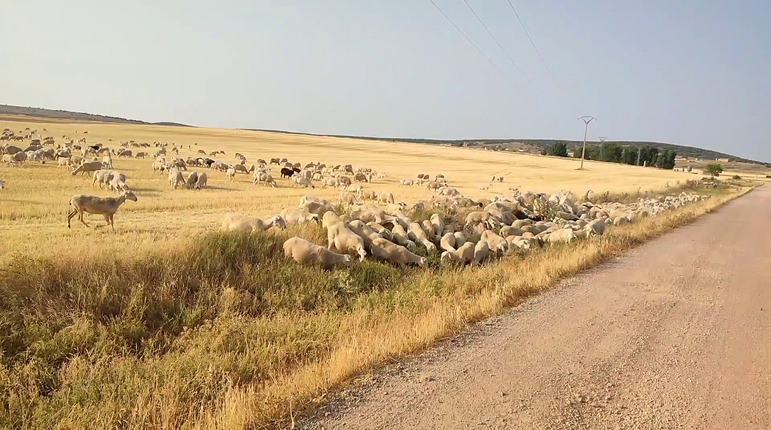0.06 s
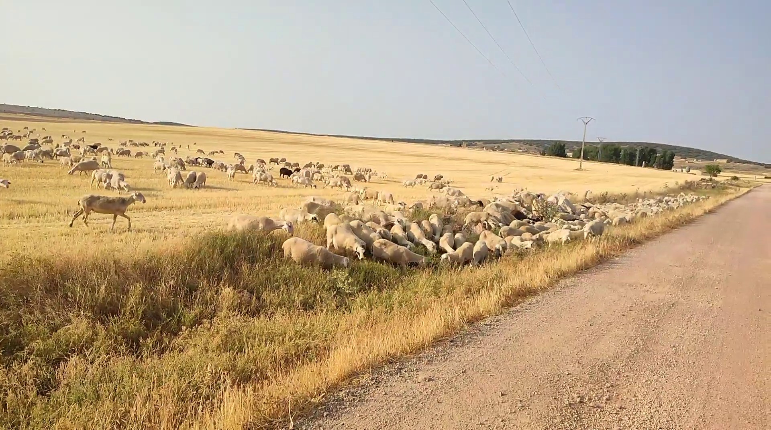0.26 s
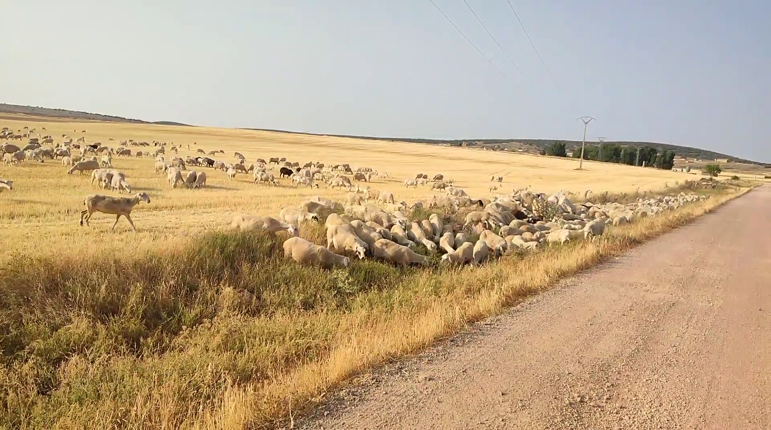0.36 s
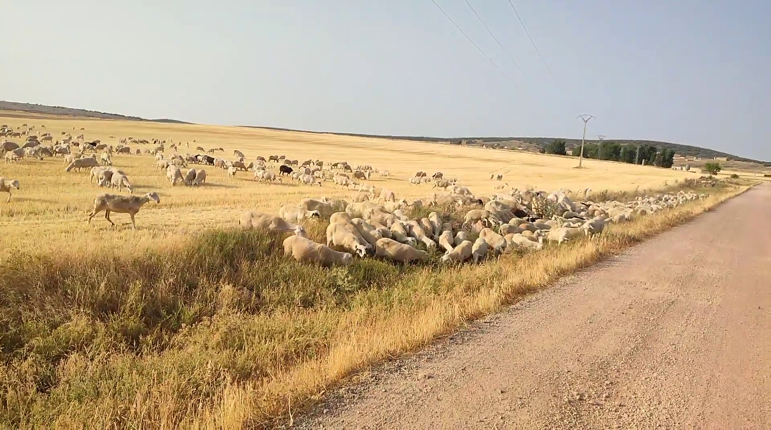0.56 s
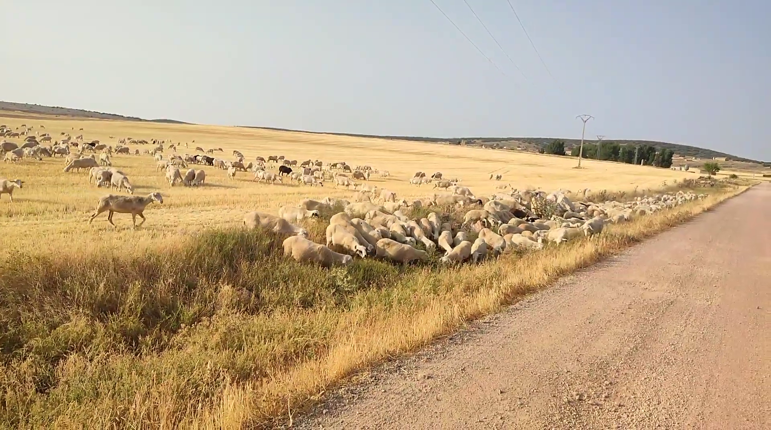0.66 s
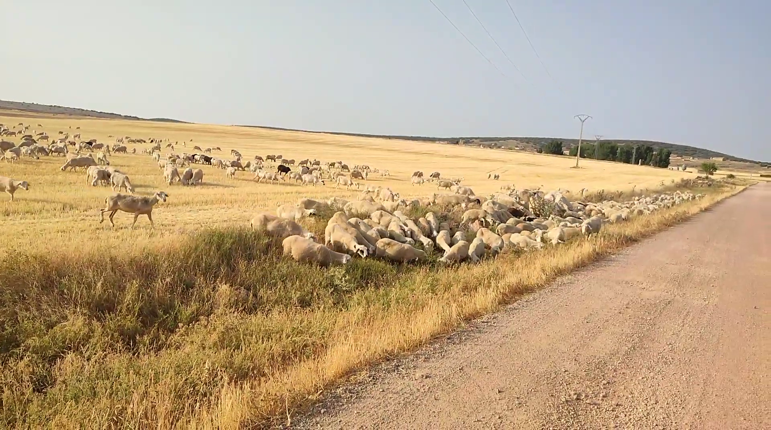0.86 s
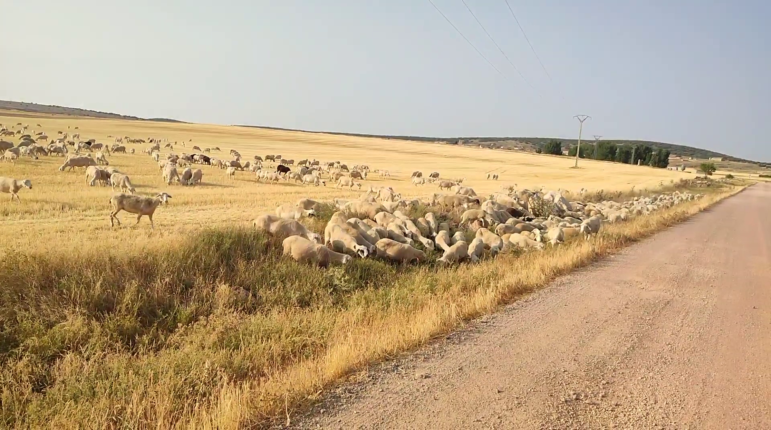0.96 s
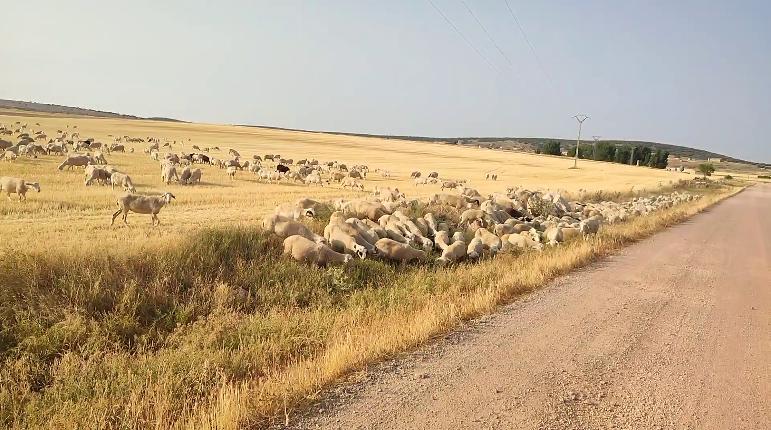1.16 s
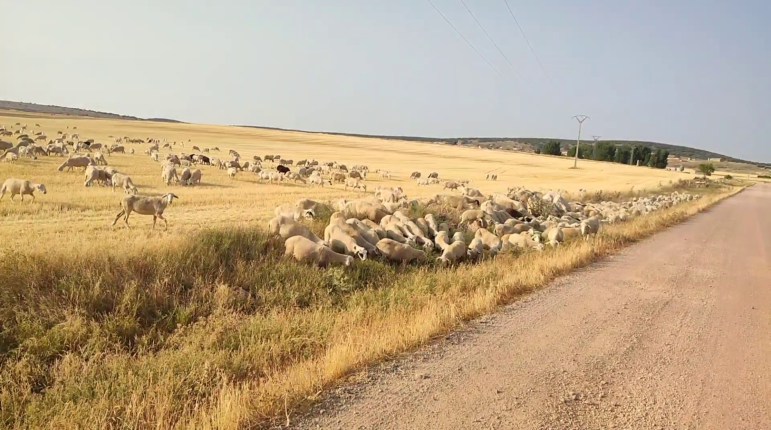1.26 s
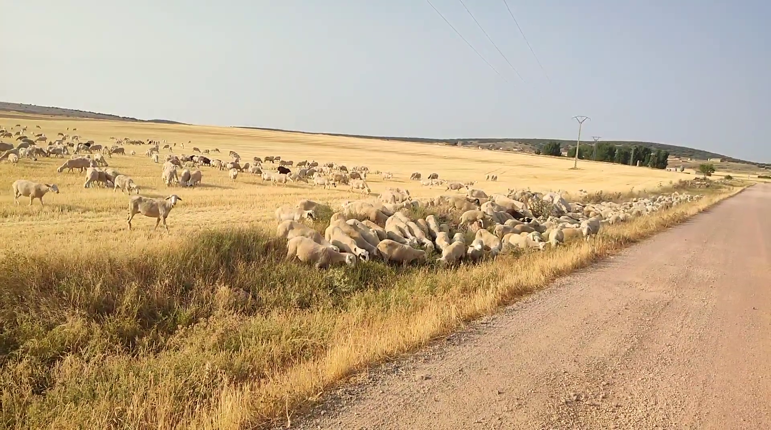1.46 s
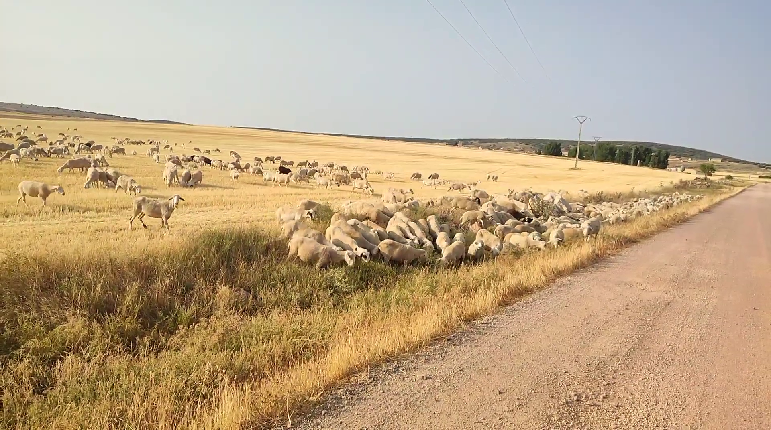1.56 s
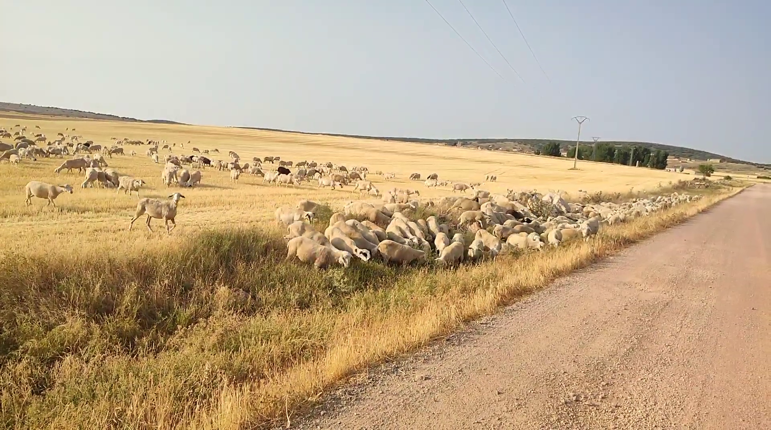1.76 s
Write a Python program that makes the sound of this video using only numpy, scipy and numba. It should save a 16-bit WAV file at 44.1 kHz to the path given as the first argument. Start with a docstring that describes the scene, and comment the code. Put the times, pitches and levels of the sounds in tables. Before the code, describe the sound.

A single sheep bleat runs from about 0.2 to 0.9 seconds, nasal and pulsing, rising quickly, holding, then dropping and turning rough. Small dry ticks and a faint bell open the scene. From about 0.95 to 1.55 a tinny neck bell clanks irregularly, strongest near 1.4, with deeper faint bells behind and a small high ting at 1.73. Steady flock rustle and breeze continue outdoors with little echo.

```python
"""A bleat and bells in a field

A sheep gives one long bleat: sharp pulses ring its throat, and the voice drops and roughens at the end.
A sheet-metal neck bell clanks as an animal walks, its clapper choking the ring; three bells sound further off.
Both are sums of fading sine tones. Under them, coloured noise makes the rustle of the flock and a light
breeze, with a few dry ticks. Two small microphones of unlike colour hear it all."""
import sys
import numpy as np
from scipy import signal
from scipy.fft import rfft, irfft, next_fast_len
from scipy.io import wavfile
from scipy.ndimage import uniform_filter1d
from numba import njit

SR = 44100
rng = np.random.default_rng(int(sys.argv[2]) if len(sys.argv) > 2 else 0)


def transcribe(u):
    """Save the signal u as a 16-bit wav file named by the first command-line argument.

    u: samples, shape (n,) or (channels, n), limited to [-1, 1]; the rate is SR.
    q: integer samples, one column per channel.
    """
    v = np.clip(np.atleast_2d(u).T, -1, 1)
    q = np.round(v * 32767).astype(np.int16)
    wavfile.write(sys.argv[1], SR, q)


N = 79380


def undb(db):
    """Turn decibels into a gain."""
    return 10 ** (np.asarray(db) / 20)


def unit(x):
    """Scale a sound to an rms level of 1."""
    return x / np.sqrt(np.mean(x ** 2) + 1e-30)


def colour(x, points):
    """Filter that follows (Hz, dB) points and never sounds before its input (minimum phase)."""
    hz, db = np.array(points, float).T
    size = 2048
    f = np.maximum(np.fft.rfftfreq(size, 1 / SR), 1)
    log_gain = np.log(undb(np.interp(np.log(f), np.log(hz), db)))
    # Folding the cepstrum onto positive times makes the filter causal
    cepstrum = irfft(log_gain)
    cepstrum[1:size // 2] *= 2
    cepstrum[size // 2 + 1:] = 0
    impulse = irfft(np.exp(rfft(cepstrum)))
    return signal.fftconvolve(x, impulse)[:N]


def shape(x, response):
    """Apply a frequency response, given as a function of Hz."""
    size = next_fast_len(2 * N)
    hz = np.maximum(np.fft.rfftfreq(size, 1 / SR), 1)
    return irfft(rfft(x, size) * response(hz), size)[:N]


def resonance(x, hz, width_hz):
    """Ring at one frequency (two-pole band-pass), with gain 1 at the centre."""
    return signal.lfilter(*signal.iirpeak(hz, hz / width_hz, fs=SR), x)


@njit
def moving_resonance(x, hz, width):
    """Band-pass whose centre moves (state-variable filter), with gain 1 at the centre."""
    y, band, low = np.empty(len(x)), 0., 0.
    for i in range(len(x)):
        g, damping = np.tan(np.pi * hz[i] / SR), width / hz[i]
        v = (band + g * (x[i] - low)) / (1 + g * (g + damping))
        band = 2 * v - band
        low = low + 2 * g * v
        y[i] = damping * v
    return y


def walk(rate):
    """Smooth random wandering with an rms near 1, from about `rate` fresh values a second."""
    hold = max(int(SR / rate), 1)
    steps = np.repeat(rng.standard_normal(N // hold + 1), hold)
    return unit(uniform_filter1d(steps, hold)[:N])


def since(start):
    """Seconds since a moment, 0 before it."""
    return np.maximum(np.arange(N) / SR - start, 0)


def burst(start, decay_s):
    """Noise that starts at once and dies away exponentially."""
    age = since(start)
    return rng.standard_normal(N) * (age > 0) * np.exp(-age / decay_s)


def fade(start, t60):
    """Loudness curve of one bell tone after a blow: a quick rise, then a loss of 60 dB in t60 seconds."""
    attack_s = .0005
    age = since(start)
    return np.exp(-np.log(1000) * age / t60) * (1 - np.exp(-age / attack_s))


def ring(hz, envelopes):
    """One bell tone (mode) as a sine wave; the energies of its blows add up."""
    phase = 2 * np.pi * (hz * np.arange(N) / SR + rng.random())
    return np.sqrt(2 * sum(e ** 2 for e in envelopes)) * np.sin(phase)


def field():
    """Breeze in the bass, mostly alike on both sides; a flickering rustle of many hooves; wind at each port."""
    # Tone of flock and breeze. Each row: frequency in Hz, relative level in dB per Hz.
    field_tone = [(25, -2.5), (60, -1), (120, -2.5), (250, -7), (450, -9), (600, -21.5), (1000, -16),
                  (1600, -12), (2500, -7), (4000, -4), (5500, -5), (7500, -16.5), (10000, -14.5),
                  (12500, -15), (15000, -24)]
    # Slow course of the rustle's loudness. Each row: time in seconds, change in level in dB.
    field_course = [(0, -2.5), (.07, -2.5), (.15, -1), (0.499, 0.5), (1.1, .5), (1.45, 3), (1.62, -3.5),
                    (1.8, 0)]
    field_db, swell_db, flicker_db = -54.5, 1.13, 1.5  # swell and flicker: typical size of the wandering
    alike_hz = 970  # the shared noise weakens above this
    buffet_db, buffet_hz = -76.5, 29  # wind on each microphone port

    lowpass = signal.butter(1, alike_hz, fs=SR)
    shared = signal.lfilter(*lowpass, rng.standard_normal(N))
    course_db = np.interp(np.arange(N) / SR, *np.array(field_course).T)
    swell = undb(course_db + swell_db * walk(5.045))
    flicker = undb(flicker_db * walk(180))
    sides = []
    for own, gust in rng.standard_normal((2, 2, N)):
        own_treble = own - 0.45 * signal.lfilter(*lowpass, own)  # bass only reduced
        rustle = unit(colour(shared + own_treble * flicker, field_tone))
        buffet = unit(resonance(gust, buffet_hz, buffet_hz))
        sides.append(undb(field_db) * swell * rustle + undb(buffet_db) * buffet)
    return np.array(sides)


def ticks():
    """Short dry ticks, as of stalks, grit or a clapper: noise bursts through a resonance."""
    # Each row: start in seconds, level in dB, centre in Hz, width in Hz, decay of the burst in seconds.
    tick_list = [(0.019, -41.5, 2140, 600, 0.0013), (.027, -47, 300, 497, 0.0022),
                 (.027, -47, 1320, 2500, 0.003), (0.0295, -60, 5500, 2500, 0.0024),
                 (0.146, -58.5, 1040, 600, 0.0082), (1.264, -53.5, 220, 248, 0.0054),
                 (1.732, -53, 3900, 1200, 0.0046)]
    out = np.zeros(N)
    for start, db, hz, width, decay in tick_list:
        make_up = np.sqrt(SR / np.pi / width)  # a narrow filter passes less noise
        out += undb(db) * make_up * resonance(burst(start, decay), hz, width)
    return out


def far_bells():
    """Three more bells that swing and ring freely: each blow sounds all the modes of its bell."""
    # Modes of each bell. Each row: frequency in Hz, relative level in dB, time to fade by 60 dB in seconds.
    thin_modes = [(704.6, -3, 1), (5164, 3, 0.3), (5170, 8.5, 0.21), (8100, -13, 0.18)]
    deep_modes = [(434.3, 0.5, 1.18), (1154, -8, 0.51)]
    small_modes = [(730, -19, 0.43), (3731, -0.5, .4), (3700, -17, 0.21), (4890, -14, 0.21)]
    # Blows on each bell. Each row: start in seconds, level in dB.
    thin_blows = [(.089, -57), (.117, -60.5)]
    deep_blows = [(0.624, -59.5), (1.0, -69.5), (1.383, -62.5), (1.549, -62.5), (1.666, -63.5)]
    small_blows = [(1.732, -48.5)]

    out = np.zeros(N)
    for modes, blows in [(thin_modes, thin_blows), (deep_modes, deep_blows), (small_modes, small_blows)]:
        for hz, db, t60 in modes:
            waver = undb(1.0 * walk(25.67))  # about 1 dB
            envelopes = [undb(db + blow_db) * fade(start, t60) for start, blow_db in blows]
            out += waver * ring(hz, envelopes)
    return out


def near_bell():
    """Each stroke clicks and rings the modes in its own balance, until the clapper on the wall chokes them."""
    # Modes of the bell. Each row: frequency in Hz, relative level in dB, time to fade by 60 dB in seconds.
    bell_modes = [(709.4, -2.5, 1.21), (745, -17, 1.4), (1834, -1.5, 1.3), (1850, -5.5, 0.59),
                  (3020, -12.5, 0.11), (3343, -4, 0.41), (3380, -2.5, 0.24), (3700, -4.5, 0.9),
                  (3880, -18, 0.82), (4660, -9, .2), (4710, -6, 0.18), (5230, -2.5, 0.36),
                  (5334, 1.5, 0.12), (7330, -20.5, 0.19), (8050, -18.5, 0.4), (9880, -17, 0.33)]
    # Where the four mode levels of a stroke apply, in Hz: fundamental, second mode, waist, rim.
    mode_groups_hz = [720, 1840, 3350, 5200]
    # Clapper strokes. Each row: start in seconds, time until choked in seconds, level in dB of the
    # fundamental, of the second mode, of the waist modes, of the rim modes, and of the contact click.
    strokes = [(0.769, 0.17, -60, -72, -71, -71, -78), (.958, 0.094, -55, -54.5, -40.5, -49, -38),
               (1.012, 0.078, -50.5, -58, -73, -73, -70), (1.084, .03, -54, -55, -55.5, -57, -40),
               (1.11, 0.14, -55.5, -60.5, -61, -56, -46), (1.283, 0.11, -56, -54, -49.5, -47.5, -36.5),
               (1.379, 0.15, -43, -41, -50.5, -45.5, -34.5), (1.394, 0.21, -75, -63, -44, -53, -37),
               (1.478, .05, -53, -46, -44, -52.5, -58), (1.546, .1, -61, -69, -72, -73, -72)]
    # Tone of the contact click. Each row: frequency in Hz, level in dB.
    click_tone = [(200, -8), (600, -4), (1100, -5), (2000, 0), (3000, -2), (5000, 0), (8000, -4),
                  (14000, -8)]
    click_s = .003
    choke_db, choke_s = -22, 0.0089  # how far the choke pulls the ring down, and how fast

    choked = undb(choke_db)
    out = np.zeros(N)
    blows = []
    for start, free_s, *group_db, click_db in strokes:
        out += undb(click_db) * colour(burst(start, click_s), click_tone)
        choke = choked + (1 - choked) * np.exp(-since(start + free_s) / choke_s)
        blows.append((start, group_db, choke))
    for hz, db, t60 in bell_modes:
        envelopes = []
        for start, group_db, choke in blows:
            level_db = db + np.interp(hz, mode_groups_hz, group_db)
            envelopes.append(undb(level_db) * fade(start, t60) * choke)
        waver = undb(1.0 * walk(45.36))  # about 1 dB
        out += ring(hz, envelopes) * waver
    return out


def bleat():
    """Throat pulses with puffs of rasp ring the throat; a narrow mouth leaves mostly one gliding resonance."""
    # Pitch of the voice. Each row: time in seconds, pitch in Hz.
    pitch_course = [(.18, 97.5), (.225, 99.8), (.26, 122.1), (.3, 142.9), (.335, 154), (.384, 159.2),
                    (.422, 165.6), (.472, 167.3), (.502, 164.1), (.602, 171.7), (.652, 172.6),
                    (.722, 166.5), (.748, 168), (.778, 167.6), (.792, 153.7), (.86, 155.6), (.89, 131.3)]
    # How the voice is driven. Each row: time in seconds, relative level in dB, mouth opening from 0 to 1,
    # roughness from 0 to 1, upper resonance in Hz.
    effort = [(0.171, -21, 0.8, 0.26, 3020), (.235, -5.5, 0.42, 0.54, 3080), (0.296, -4, 0.56, 0.36, 2940),
              (.34, 2, 0.71, 0.31, 2860), (.42, -1.5, 0.99, 0.07, 2520), (0.499, -2.5, 1, 0.16, 2430),
              (.65, 0, 0.94, 0.02, 2850), (.72, 1, 0.69, 0.14, 2730), (.77, -2, 1, 0, 2880),
              (.8, 2.5, 0.63, 0.65, 3190), (.855, 1.5, 0.48, 0.53, 3110), (0.886, -11.5, 0.9, 0.45, 3170),
              (.91, -33, 0.41, 0.51, 3130)]
    # Tone of the open throat and mouth. Each row: frequency in Hz, relative level in dB.
    throat_tone = [(100, -14), (170, -19), (340, -22.5), (510, -16), (690, -24.5), (860, -17.5),
                   (1200, -16.5), (1380, 0), (1530, 5), (1720, -10.5), (1900, -20), (2240, -3), (2420, 3),
                   (2700, -1), (2900, 4), (3150, -2.5), (3480, -16), (3780, -2.5), (4450, -14.5),
                   (5500, -20.5), (8000, -44), (14000, -58)]
    flutter = .002  # typical wandering of the pitch, as a fraction
    jitter_s, shimmer_db = .00018, .8  # typical pulse unevenness at full roughness: timing and size
    rasp_db = -26  # without roughness, relative to the pulses
    lips_width_hz, lips_db = 220, 1.5  # the upper resonance, which stays when the mouth narrows
    open_db = -8  # how far an open mouth cancels the lift of that resonance
    bleat_db = -36  # level if the bleat's energy filled half a second

    t = np.arange(N) / SR
    when, db, mouth, rough, lips_hz = np.array(effort).T
    voiced = (t > when[0]) * (t < when[-1])
    hz = np.interp(t, *np.array(pitch_course).T) * (1 + flutter * walk(59.6))
    cycles = np.cumsum(hz * voiced) / SR

    # One pulse for each whole cycle, uneven where the voice is rough
    beats = np.interp(np.arange(1, int(cycles[-1])), cycles, t)
    chance = rng.standard_normal((len(beats), 2))
    uneven = np.clip(np.interp(beats, when, rough), 0, 1)
    places = (beats + jitter_s * uneven * chance[:, 0]) * SR
    sizes = undb(shimmer_db * np.sqrt(uneven) * chance[:, 1])
    pulses = np.zeros(N)
    taps = np.arange(-8, 9)
    for at, size in zip(places, sizes):
        near = int(at) + taps
        # A windowed sinc places the pulse between samples
        pulses[near] += size * np.sinc(near - at) * np.hanning(len(taps))

    # A puff of noise starts each cycle and fades within it
    puffs = rng.standard_normal(N) * np.exp(-(cycles % 1) / .35) * voiced
    rasp = undb(rasp_db) * unit(puffs) * (1 + 5.3 * np.interp(t, when, rough))
    source = unit(pulses) + rasp
    throat = colour(source * undb(np.interp(t, when, db)), throat_tone)

    opening = np.clip(np.interp(t, when, mouth), 0, 1)
    lips = moving_resonance(throat, np.interp(t, when, lips_hz), float(lips_width_hz))
    voice = opening * throat + (1 - undb(open_db) * opening) * undb(lips_db) * lips
    return undb(bleat_db) * unit(voice) * np.sqrt(.5 * SR / N)


def scene():
    """The animals reach the left microphone first; the ground and grass scatter a faint short tail."""
    # Lead of the left microphone for sound from the flock. Each row: frequency in Hz, phase in radians.
    left_lead = [(0, -0.5), (430, 1.05), (720, 1.43), (950, 0.84), (1720, 4.5), (2070, 6), (3010, 8),
                 (5340, 15), (22050, 52)]
    scatter_t60_s = 0.33
    voice_scatter_db, bell_scatter_db = -16, -21.5

    t = np.arange(N) / SR
    voice = bleat()
    bells = near_bell() + far_bells()
    direct = voice + bells + ticks()
    lagging = shape(direct, lambda hz: np.exp(-1j * np.interp(hz, *np.array(left_lead).T)))
    pair = np.array([direct, lagging])

    # Fading noise, different on each side, smears the voice and bells into a tail
    spill = undb(voice_scatter_db) * voice + undb(bell_scatter_db) * bells
    tails = rng.standard_normal((2, N)) * np.exp(-np.log(1000) * t / scatter_t60_s)
    scatter = np.array([signal.fftconvolve(spill, unit(tail) / np.sqrt(N))[:N] for tail in tails])
    return pair + scatter + field()


def record(dry):
    """The left microphone is weak in the presence range, the right has a notch above it; the top is cut."""
    # Tone of each microphone. Each row: frequency in Hz, level in dB.
    left_mic = [(100, 0), (400, -2), (700, 2.5), (1000, 3.5), (1350, -8), (2300, -6.5), (3000, -12.5),
                (3600, -13), (5000, -14), (7500, 8), (10000, -4.5), (14000, 1)]
    right_mic = [(100, -0.5), (6500, 1), (7500, -7.5), (8200, -49), (8800, 4), (9500, -17.5), (12000, 2)]
    top_hz = 14400

    heard = []
    for x, mic in zip(dry, (left_mic, right_mic)):
        mic_hz, mic_db = np.array(mic, float).T
        heard.append(shape(x, lambda hz: undb(np.interp(np.log(hz), np.log(mic_hz), mic_db))))
    top_cut = signal.ellip(10, .2, 70, top_hz, fs=SR, output="sos")
    return signal.sosfilt(top_cut, np.array(heard))


dry = scene()
out = record(dry)
transcribe(out)
```